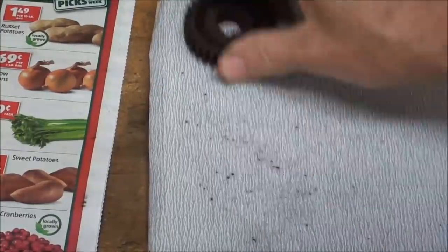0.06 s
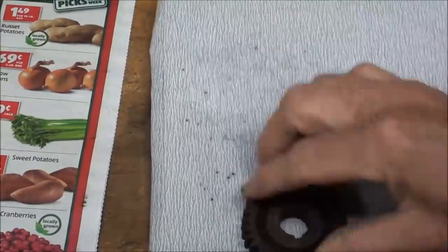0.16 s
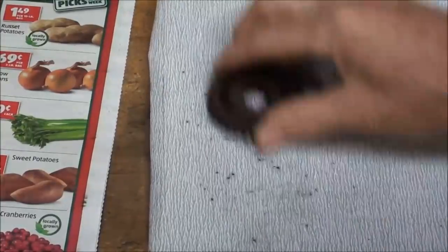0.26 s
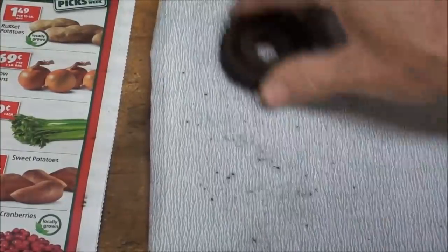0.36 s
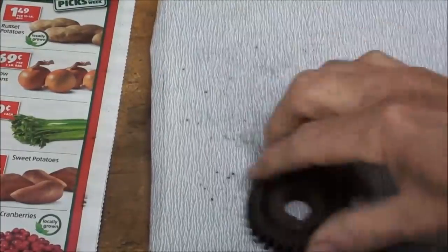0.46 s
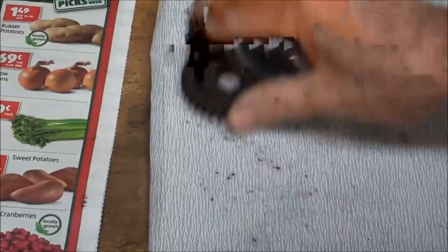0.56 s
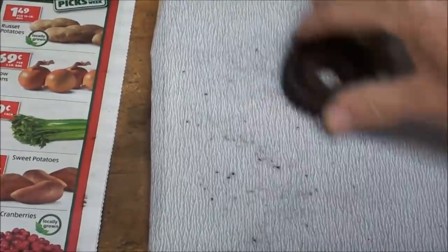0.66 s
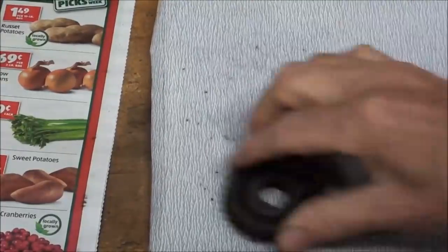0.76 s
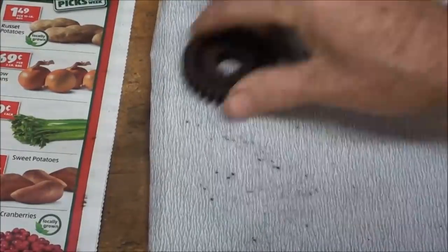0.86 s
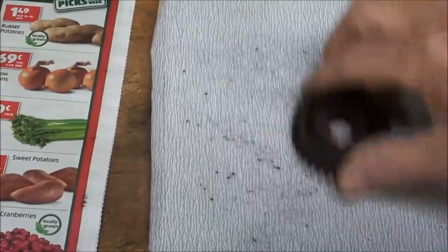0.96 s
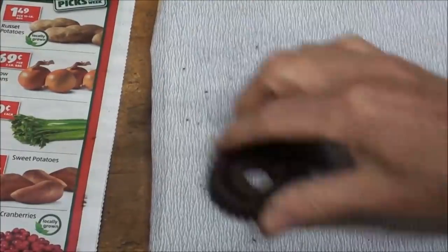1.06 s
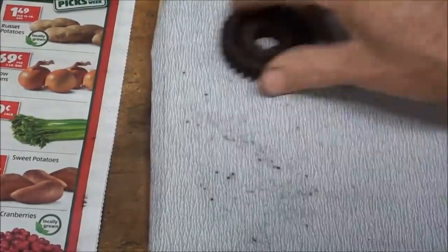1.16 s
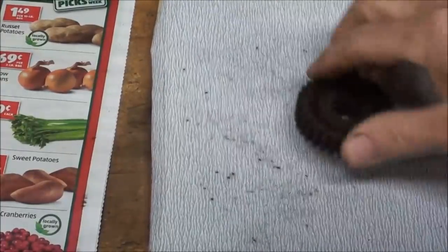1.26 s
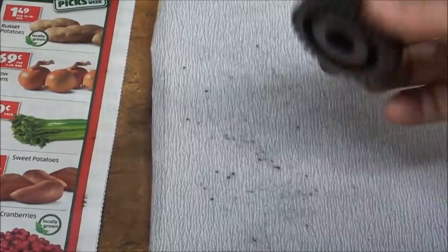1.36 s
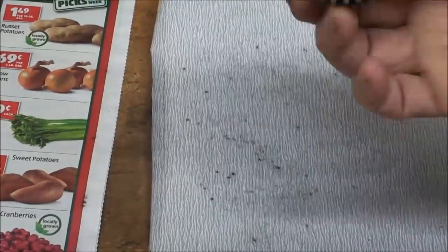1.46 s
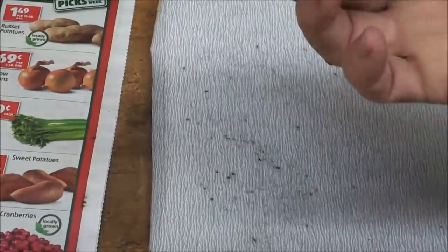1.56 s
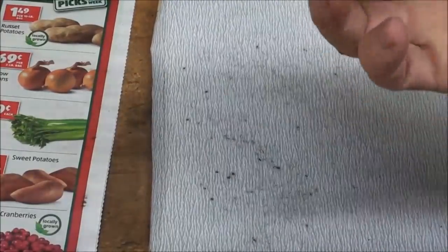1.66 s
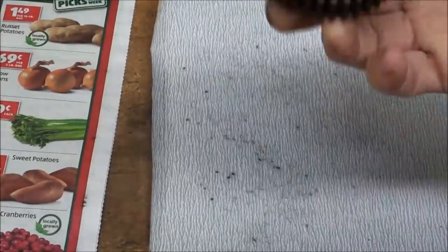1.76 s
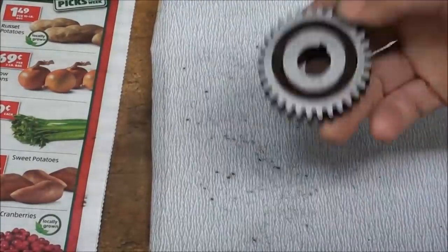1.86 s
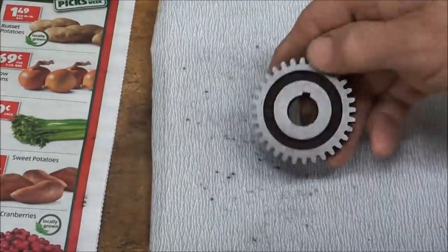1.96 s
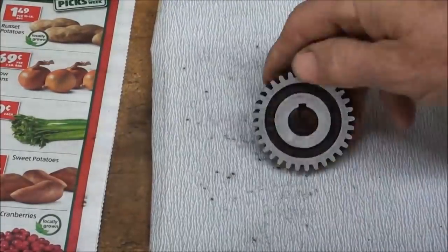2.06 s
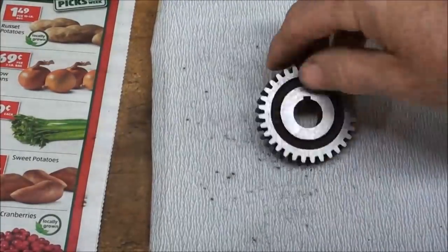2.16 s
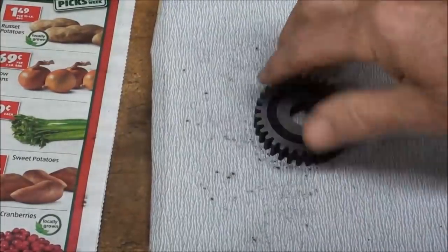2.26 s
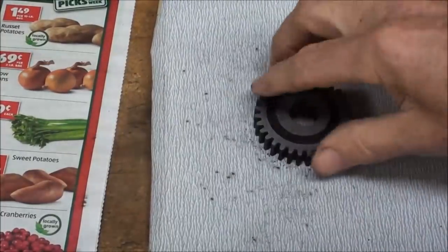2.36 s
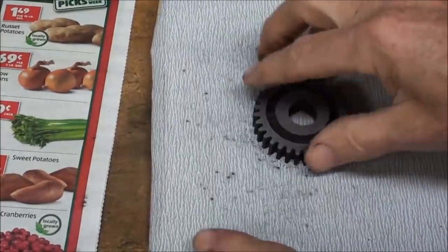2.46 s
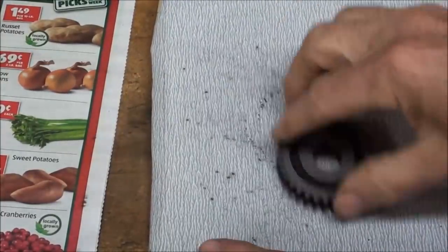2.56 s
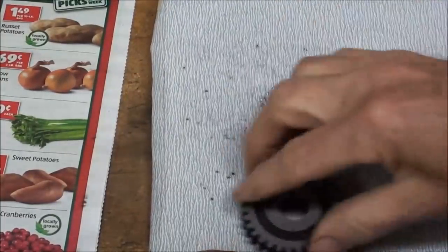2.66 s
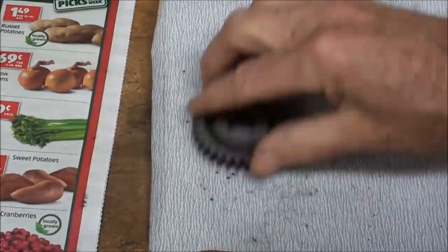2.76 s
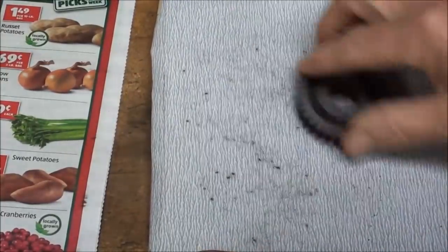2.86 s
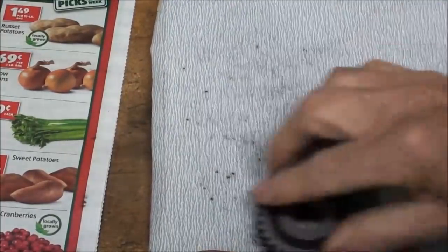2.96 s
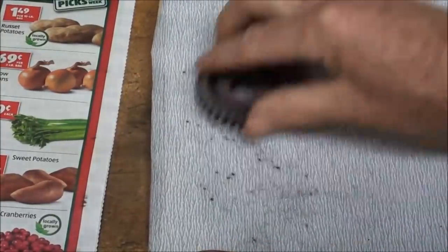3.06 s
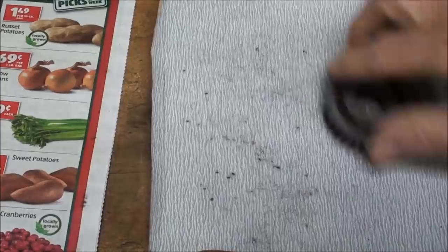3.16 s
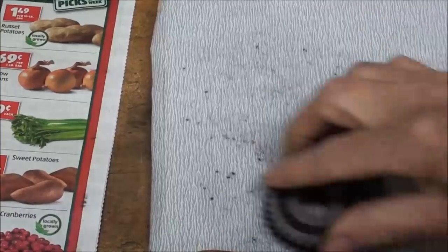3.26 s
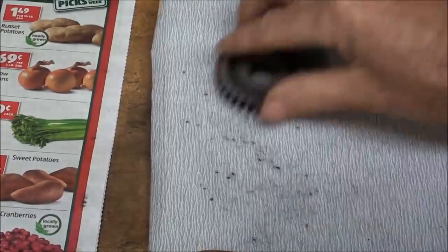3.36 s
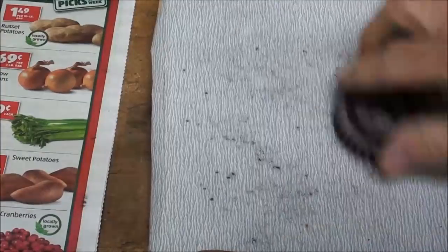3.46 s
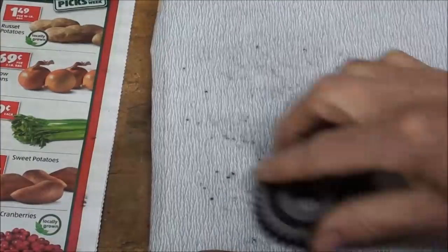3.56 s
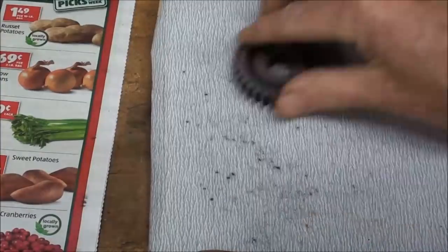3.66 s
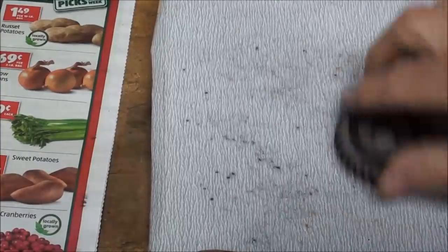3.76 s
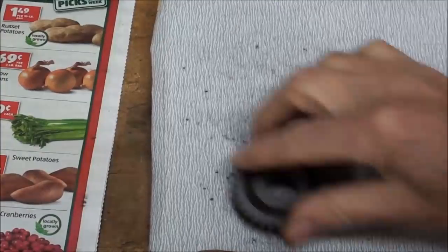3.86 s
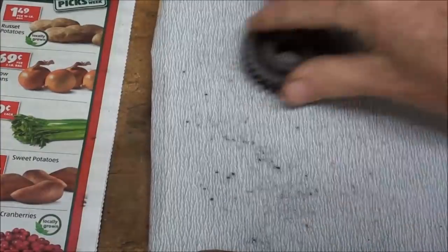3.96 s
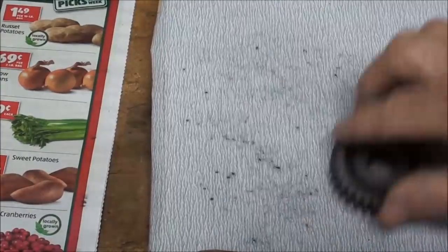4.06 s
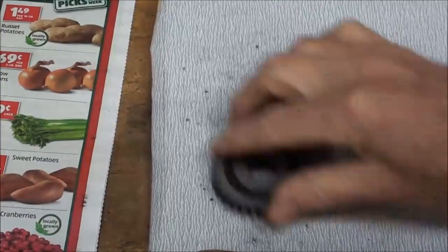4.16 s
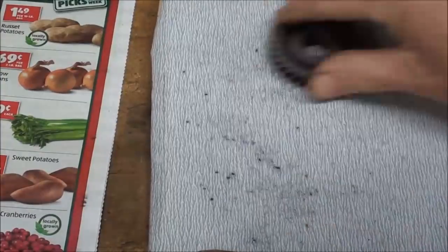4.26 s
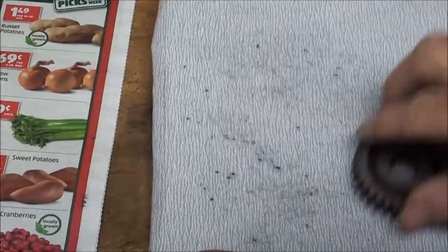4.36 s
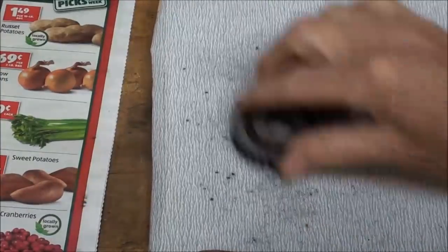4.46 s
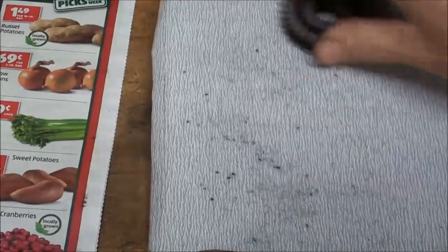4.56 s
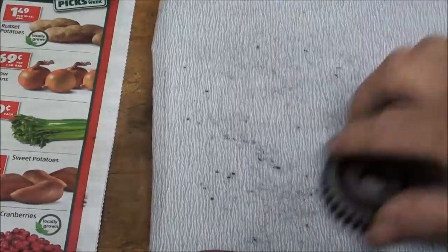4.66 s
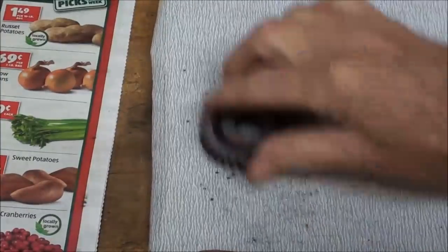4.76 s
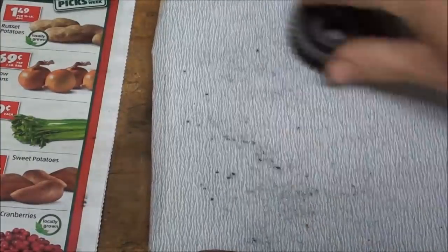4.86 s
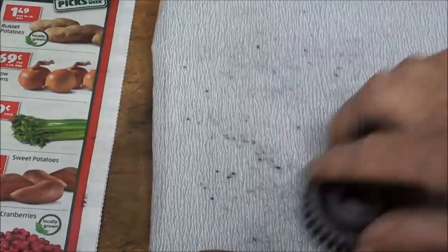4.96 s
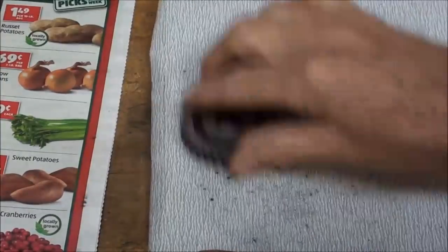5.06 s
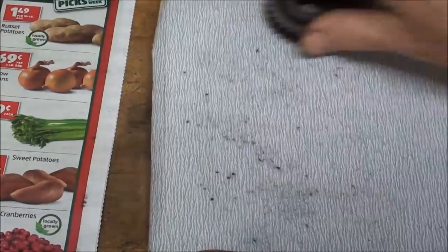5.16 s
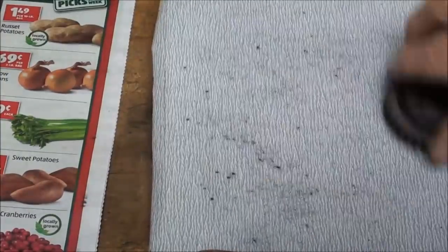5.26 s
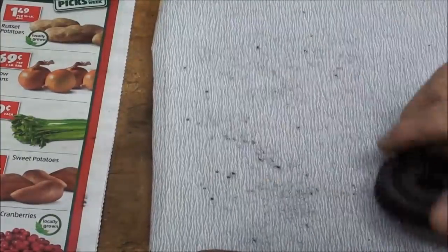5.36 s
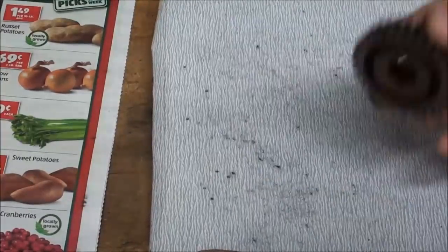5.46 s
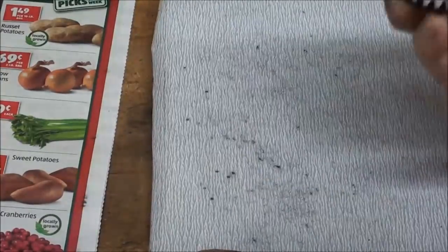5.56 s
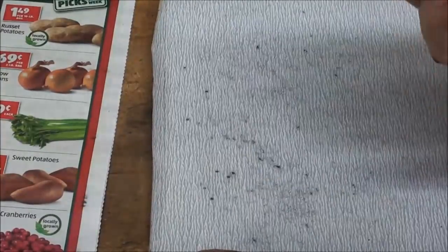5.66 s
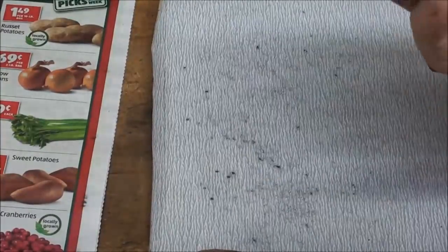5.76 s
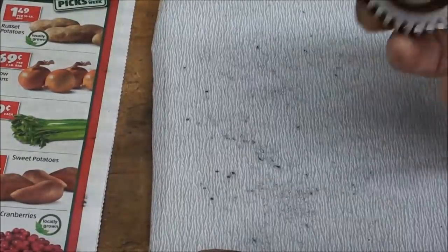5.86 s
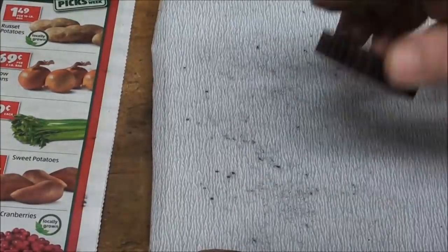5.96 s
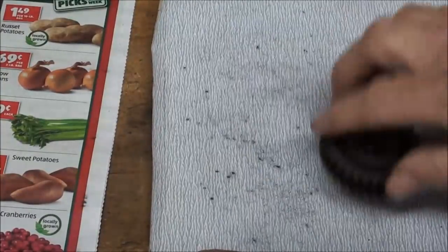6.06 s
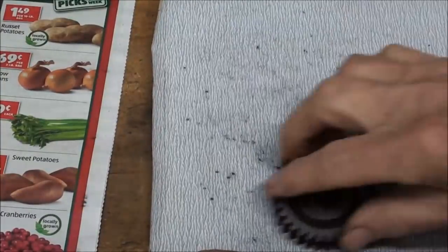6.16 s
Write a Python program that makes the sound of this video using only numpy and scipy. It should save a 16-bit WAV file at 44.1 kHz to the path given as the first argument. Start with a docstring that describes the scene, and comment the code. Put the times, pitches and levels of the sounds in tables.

```python
"""In a workshop, a cast iron gear is rubbed in circles on sandpaper lying on a wooden bench.
Grit hisses and scrapes under it, and it sticks and slips as the strokes turn, shaking the bench.
It is lifted, set on its rim, dropped flat and rubbed again, then lifted and set down once more.
Each blow thumps the wood and rings the iron. The room echoes, and faint workshop air lies behind."""
import sys
import numpy as np
from scipy import signal
from scipy.fft import rfft, irfft
from scipy.io import wavfile
from scipy.ndimage import uniform_filter1d

SR = 44100
rng = np.random.default_rng(int(sys.argv[2]) if len(sys.argv) > 2 else 0)


def wav_out(sig):
    """Save sig, one row per channel (or a flat mono array), as 16-bit PCM at SR to the path in sys.argv[1]."""
    wavfile.write(sys.argv[1], SR, np.round(np.clip(np.atleast_2d(sig).T, -1, 1) * 32767).astype(np.int16))


N = 274743
TIME = np.arange(N) / SR

# The notes the bench top rings at: pitch_hz, level_db, ring_s (time to fade by 60 dB)
BENCH_NOTES = [(170, -6.5, 0.12), (215, -3.5, 0.089), (420, -12, 0.087), (443, 2, 0.046), (494, -14, 0.16),
               (621.7, -9.5, 0.16), (716, -3, 0.092), (848, -1, 0.082), (998, -1.5, 0.053),
               (1094, -14.5, 0.065), (1185, 4.5, 0.05), (1382, -3.5, 0.085), (1670, -25, 0.082),
               (1620, 1.5, 0.06)]
# The tone of a thump in wood: pitch_hz, level_db
WOOD_TONE = [(50, -30), (130, 6.5), (220, 0.5), (420, -1.5), (1300, -1), (1700, -5.5), (2500, -8.5),
             (5000, -13)]
# Hand strokes, turn to turn; fizz and scrape are relative to the hiss, the judder is at the start:
# start_s, hiss_db, fizz_db, scrape_db, drone_db, drone_hz, judder_db, judder_half_length_s
HAND_STROKES = [ (-0.04, -12, -1, -21.5, -31.5, 623, -64, .03),
                (0.242, -13, -2.5, -23, -36, 610, -28, 0.027), (0.52, -11, -2, -20.5, -30, 562, -37, 0.031),
                (0.793, -12, -1.5, -20.5, -34, 583, -35, 0.016),
                (1.066, -15.5, -3, -22, -36.5, 576, -35, 0.043),
                (2.482, -16.5, -7.5, -18.5, -54, 475, -66, .03),
                (2.74, -11, -3, -21.5, -31.5, 507, -63, 0.027),
                (3.018, -10, -3, -23, -31, 580, -37.5, 0.033),
                (3.302, -10.5, -2.5, -22, -32.5, 644, -26.5, 0.024),
                (3.591, -10, -2, -20.5, -30.5, 636, -27, 0.028),
                (3.879, -13.5, -2, -21.5, -35.5, 623, -28.5, 0.024),
                (4.154, -11, -2, -21.5, -34, 630, -28.5, .042),
                (4.468, -10.5, -1.4, -22, -32, 650, -27.5, .04),
                (4.736, -10.5, -3, -23.5, -38.5, 610, -29.5, 0.041),
                (5.039, -10.5, -1.5, -21.5, -26, 610, -29, 0.038), (6.09, -11, -6, -21, -45, 600, -70, .02),
                ]


def rubbing(speed, hiss_db, fizz_db, scrape_db):
    """Dense grit hisses, brighter when the hand is fast; coarser grains scrape through the bench."""
    # The tones of the fine hiss and the coarse scrape: pitch_hz, level_db
    hiss_tone = [(1500, -42.5), (3000, -21), (4300, -13), (4900, -8.5), (5250, -3.5), (5900, -5.5),
                 (7000, -1), (8200, -3), (9100, -1.5), (10500, -4), (12000, -6), (13200, -10), (16000, -13)]
    scrape_tone = [(100, -13), (250, -18), (450, 1), (680, -1), (900, 1.5), (1250, 2.5), (2000, 4),
                   (3000, 5), (4000, 7.5), (6000, -12.5)]
    speed_fizz_db, speed_hiss_db = 3, -0.5  # added at full hand speed
    hiss = shimmer(colour(grit(per_s=26000), hiss_tone))
    fizz = colour(hiss, [(7000, -10.5), (9500, -2.5), (12000, 3.0)])  # the highest part of the hiss
    hiss = hiss + fizz * (amp(fizz_db + speed_fizz_db * speed) - 1)
    hiss *= amp(1 + speed_hiss_db * speed + 0.47 * drift(hz=70))
    scrape = ring(unit(colour(grit(per_s=7000), scrape_tone)), BENCH_NOTES, share=0.048)
    scrape *= amp(scrape_db + 2 * drift(hz=21))
    return amp(hiss_db + 1.02 * drift(hz=14)) * (hiss + scrape)


def shimmer(hiss, depth=0.24, width_hz=450):
    """As different teeth press on the paper, narrow parts of the hiss swell and fade."""
    pitches = np.geomspace(2800, 12000, num=12)
    return unit(hiss + sum(depth * drift(hz=22) * band(hiss, hz, width_hz) for hz in pitches))


def hand(longest_stroke_s=0.27):
    """Hand speed (0-1) rises and falls each stroke; the rubbing settings glide between strokes."""
    start, *settings, _, _ = np.transpose(HAND_STROKES)
    length = np.minimum(np.diff(start, append=np.inf), longest_stroke_s)
    speed = sum(np.sin(np.pi * np.clip((TIME - s) / span, 0, 1)) ** 2 for s, span in zip(start, length))
    return speed, *(np.interp(TIME, start + length / 2, column) for column in settings)


def contact(lift_db_per_s=570):
    """How firmly the gear meets the paper (0-1): it presses down, skips now and then, and lifts."""
    # Spells of rubbing: start_s, lift_s, press_down_s
    spells = [(0.0, 1.262, 0.00071), (2.515, 5.352, 0.058), (6.13, 6.3, .025)]
    # The gear briefly loses its grip: time_s, share_lost (0-1), half_length_s
    skips = [(0.078, 0.74, 0.0087), (0.218, 0.79, 0.015), (0.363, 0.65, 0.015), (2.665, 0.25, 0.037),
             (3.278, 0.36, .012)]
    pressed = sum(np.clip((TIME - down) / rise, 0, 1) * amp(-lift_db_per_s * np.maximum(TIME - lift, 0))
                  for down, lift, rise in spells)
    grip_lost = sum(share * swell(s, 0, half) for s, share, half in skips)
    return pressed * np.clip(1 - grip_lost, 0, 1)


def blows(spread=1.86, crack_fade_s=0.048, rise_s=0.0005):
    """Each blow cracks the grit; a quickly dying rattle of teeth thumps the bench and rings the iron."""
    # Blows of gear or hand: start_s, thump_db, thump_hz, clack_db, crack_db, fade_s (to fall 60 dB)
    hits = [(1.4, -65, 400, -31, -31.5, 0.04), (1.676, -31, 180, -70, -56, 0.082),
            (2.079, -5.5, 560, -19, -17, 0.065), (2.086, -26, 625, -45, -60, 0.16),
            (2.24, -36, 600, -25, -18, 0.044), (2.2412, -13, 505, -7.5, -30, 0.19),
            (2.262, -17, 480, -14, -45, 0.2), (2.285, -14, 417, -18.5, -16.5, 0.16),
            (2.31, -18.5, 500, -23.5, -45, 0.11), (4.863, -24, 200, -52, -60, 0.11),
            (5.986, -65, 400, -38, -46, 0.024), (6.131, -6.5, 1140, -14.5, -7.5, 0.073),
            (6.142, -7, 1130, -28, -24, 0.19), (6.154, -17, 200, -43, -52, 0.12)]
    # The notes the gear rings at: pitch_hz, level_db, ring_s
    gear_notes = [(1420, -8, .06), (2010, -2, 0.049), (2160, -9, 0.056), (2470, 11, 0.15),
                  (2460, -18, 0.05), (3020, 2, 0.045), (3180, 13, 0.03), (4700, 12, 0.047),
                  (5200, -5, 0.041), (7360, -8, .05)]
    # The tones of iron clacking on grit and of grit cracking: pitch_hz, level_db
    clack_tone = [(200, -24), (800, -7), (1500, 7), (2000, 4.5), (2700, 7), (3900, 2), (5300, 3),
                  (7500, -5), (9500, -17.5), (12000, -29), (16000, -38)]
    crack_tone = [(1500, -10.5), (3000, -27), (5300, 2.5), (7300, 2), (9500, -6), (12000, -13),
                  (16000, -32)]
    t, out = np.arange(SR // 2) / SR, np.zeros(N)
    for start, thump_db, hz, clack_db, crack_db, fade_s in hits:
        wood, iron, grains = rng.standard_normal((3, len(t)))
        touch = amp(-60 * t / fade_s) * (1 - np.exp(-t / rise_s))
        wood = steep_band(colour(wood, WOOD_TONE), hz, spread * hz)
        thump = ring(wood * touch, BENCH_NOTES, share=0.3)
        clack = ring(unit(colour(iron, clack_tone)) * touch, gear_notes, share=0.04)
        crack = unit(colour(grains, crack_tone)) * amp(-60 * t / crack_fade_s)
        add(out, start, amp(thump_db) * thump + amp(clack_db) * clack + amp(crack_db) * crack)
    return out


def judders(turn_hz=1245, spread=0.72, uneven_db=2.0):
    """The gear sticks and slips in fits that build towards each turn or catch, shaking the bench."""
    # The gear catches for an instant: time_s, level_db, half_length_s, pitch_hz
    catches = [(0.395, -43, 0.021, 261), (.59, -31.5, 0.01, 525), (0.7, -26, .02, 530),
               (0.884, -32.5, 0.033, 540), (3.152, -28.5, 0.02, 534), (3.865, -25, 0.006, 1250),
               (4.924, -27.5, .014, 604), (5.2, -32.5, 0.027, 1200), (5.265, -31, .016, 616)]
    turns = [(s, db, half, turn_hz) for s, *_, db, half in HAND_STROKES]
    slips = ring(colour(grit(per_s=1500), WOOD_TONE), BENCH_NOTES, share=0.14)
    slips *= amp(uneven_db * drift(hz=68))
    return sum(swell(s, db, half, lead=1.7) * steep_band(slips, hz, spread * hz)
               for s, db, half, hz in turns + catches)


def drone(speed, drone_db, centre_hz, width_hz=210, wander_hz=25, uneven_db=3.5):
    """Coarse grains stir a rough hum that slides as the gear circles, loudest in mid-stroke."""
    turn_db, turn_rise_hz = -8.5, 58.6  # weaker and higher where the hand turns
    shaking = ring(grit(per_s=3000), BENCH_NOTES, share=0.075)
    hz = centre_hz + turn_rise_hz * (1 - speed) + wander_hz * drift(hz=17)
    # A band that follows the pitch: shift the sound down, smooth it, shift it back up.
    shift = np.exp(2j * np.pi * np.cumsum(hz) / SR)
    decay = np.exp(-np.pi * width_hz / SR)
    smoothed = signal.lfilter([1], [1, -2 * decay, decay ** 2], shaking / shift)
    hum = unit((shift * smoothed).real)
    return hum * amp(drone_db - 1.5 + turn_db * (1 - speed) + uneven_db * drift(hz=23))


def singing():
    """Grit keeps one note of the loosely held gear sounding hoarsely for a moment."""
    # The brief notes: time_s, level_db, half_length_s, pitch_hz, width_hz
    notes = [(2.172, -47, 0.0085, 2550, 250), (2.195, -57, 0.14, 10000, 90), (2.257, -30, 0.012, 9930, 90),
             (2.655, -32, 0.06, 2580, 200), (2.953, -32, 0.082, 2920, 450), (3.25, -31, 0.063, 2950, 450),
             (3.546, -30, 0.057, 2980, 450), (3.823, -33, .06, 3170, 450), (4.11, -37, 0.061, 3100, 450)]
    grains = grit(per_s=8000)
    return sum(swell(s, db, half) * steep_band(grains, hz, width) for s, db, half, hz, width in notes)


def scuffs():
    """The gear or a finger grazes the grit."""
    # Light touches: time_s, level_db, half_length_s
    touches = [(1.418, -46, 0.03), (1.76, -50.5, .03), (2.167, -38, 0.0088), (2.457, -33.5, .016),
               (5.483, -37.5, 0.003)]
    scuff_tone = [(1200, -25), (2500, -10), (4000, -1.5), (7000, 4), (10000, -4), (15000, -20)]
    hiss = unit(colour(grit(per_s=15000), scuff_tone))
    return hiss * sum(swell(*touch) for touch in touches)


def close_echoes(x):
    """The direct sound, plus echoes off bench and hand that differ a little between left and right."""
    # How much the two sides differ: pitch_hz, level_db
    side_tone = [(100, -38), (300, -25), (650, -13), (1200, -20), (2000, -28), (4000, -25), (6000, -16),
                 (9000, -16), (11000, -28), (13000, -45)]
    echoes = rng.standard_normal(size=700) * np.linspace(1, 0, num=700)
    side = colour(signal.fftconvolve(x, echoes / np.linalg.norm(echoes))[:N], side_tone)
    return np.array([x + side, x - side])


def room_echo(x, bass_ring_s=0.35, dull_hz=7000, apart=0.097, echoes_per_s=4000, gap_s=0.004):
    """Scattered echoes of the workshop, partly different on each side; the treble dies sooner."""
    # The strength of the room's echo: pitch_hz, level_db
    room_tone = [(150, -1), (500, -3.5), (1200, -10), (3000, -6.5), (5500, -12.5), (9000, -18),
                 (14000, -57)]
    size = SR * 2 // 3
    echoes = rng.standard_normal((3, size)) * (rng.random((3, size)) < echoes_per_s / SR)
    echoes *= np.arange(size) > gap_s * SR
    echoes = echoes[0] + apart * echoes[1:]
    hz, t, spectrum = signal.stft(echoes, SR, nperseg=256)
    ring_s = bass_ring_s / np.sqrt(1 + hz / dull_hz)
    fade = amp(-60 * t / ring_s[:, None])
    fade *= amp(level_at(room_tone, hz))[:, None] / np.sqrt(np.mean(fade ** 2, 1, keepdims=True))
    tail = signal.istft(spectrum * fade, SR, nperseg=256)[1] / np.linalg.norm(echoes[0])
    return signal.fftconvolve(x[None], tail, axes=1)[:, :N]


def air(level_db=-40.5, waver_db=1.3, lean_left_db=0.5):
    """The steady, low rush of the room."""
    # The tone of the air, and how much its two sides differ: pitch_hz, level_db
    air_tone = [(18, -33.5), (30, -22), (123, -8), (156, -16), (307, -4), (379, -13.5), (532, -8.5),
                (656, -17.5), (897, -16.5), (1330, -25.5), (2020, -26.5), (3680, -30), (4660, -25.5),
                (6050, -32), (15500, -37)]
    side_tone = [(100, -20), (380, -14), (700, -10), (1300, -5), (2400, -5), (4400, -12), (8000, -11),
                 (15000, -30)]
    side = colour(rng.standard_normal(N), side_tone)
    rush = unit(colour(rng.standard_normal(N) + np.array([side, -side]), air_tone))
    return rush * amp(level_db + waver_db * drift(hz=15)) * amp([[lean_left_db], [-lean_left_db]])


def grit(per_s):
    """Tiny clicks of random size as grains catch the iron and let go."""
    return rng.standard_normal(N) * (rng.random(N) < per_s / SR)


def ring(x, notes, share):
    """Passes x through an object: a share (0-1) rings at its notes, the rest comes straight out."""
    t = np.arange(SR // 3) / SR
    tone = sum(amp(db - 60 * t / ring_s) * np.cos(2 * np.pi * hz * t) for hz, db, ring_s in notes)
    rung = unit(signal.fftconvolve(x, tone)[:len(x)]) * np.std(x)
    return unit(np.sqrt(1 - share) * x + np.sqrt(share) * rung) * np.std(x)


def amp(db):
    """Turns decibels into a multiplier."""
    return 10 ** (np.asarray(db) / 20)


def unit(x):
    """Scales x to an average power of 1."""
    return x / np.sqrt(np.mean(x ** 2) + 1e-20)


def level_at(tone, hz):
    """Reads between the rows (pitch_hz, level_db) of a tone table."""
    pitches, levels = np.transpose(tone)
    return np.interp(np.log(hz + 1), np.log(pitches + 1), levels)


def colour(x, tone):
    """Shapes x by a tone table and fades out what is too low to hear."""
    hz = np.fft.rfftfreq(x.shape[-1], 1 / SR)
    return irfft(rfft(x) * amp(level_at(tone, hz)) * hz ** 2 / (hz ** 2 + 400), x.shape[-1])


def band(x, hz, width_hz):
    """Keeps the part of x near one pitch."""
    return signal.lfilter(*signal.iirpeak(hz, hz / width_hz, fs=SR), x)


def steep_band(x, hz, width_hz):
    """The same band twice for steeper edges, scaled to power 1."""
    return unit(band(band(x, hz, width_hz), hz, width_hz))


def drift(hz):
    """A slow random wander of power 1; hz sets how fast."""
    rates = np.fft.rfftfreq(N, 1 / SR)
    return unit(irfft(rfft(rng.standard_normal(N)) * np.exp(-(rates / hz) ** 2), N))


def swell(peak_s, db, half_s, lead=1):
    """A bell-shaped rise and fall of level; lead stretches the rise."""
    return amp(db) * np.exp(-((TIME - peak_s) / np.where(TIME < peak_s, half_s * lead, half_s)) ** 2)


def add(mix, start_s, sound):
    """Mixes a sound in at its start time."""
    part = mix[round(start_s * SR):][:len(sound)]
    part += sound[:len(part)]


def scene(rub_db=4, blow_db=4):
    """Gear and bench in the middle, the room around them."""
    speed, hiss_db, fizz_db, scrape_db, drone_db, drone_hz = hand()
    sanding = contact() * (rubbing(speed, hiss_db, fizz_db, scrape_db) + drone(speed, drone_db, drone_hz))
    near = amp(rub_db) * (sanding + judders() + singing()) + amp(blow_db) * blows() + scuffs()
    return close_echoes(near) + room_echo(near) + air()


def record(dry, limit_db=-13.0, recover_db_per_s=60, squeeze=0.72, top_hz=15850):
    """A fast volume control turns loud moments down, room and all; then the highest treble is cut."""
    power_db = 10 * np.log10(abs(uniform_filter1d((dry ** 2).mean(0), size=300)) + 1e-12)
    recovery_db = TIME * recover_db_per_s
    peak_db = np.maximum.accumulate(power_db + recovery_db) - recovery_db
    over_db = uniform_filter1d(np.maximum(peak_db - limit_db, 0), size=60)
    held = np.clip(dry / amp(squeeze * over_db), -1, 1)
    treble_cut = signal.firwin(511, top_hz, window=("kaiser", 9), fs=SR)
    return signal.oaconvolve(held, treble_cut[None], "same")


dry = scene()
out = record(dry)
wav_out(out)
```